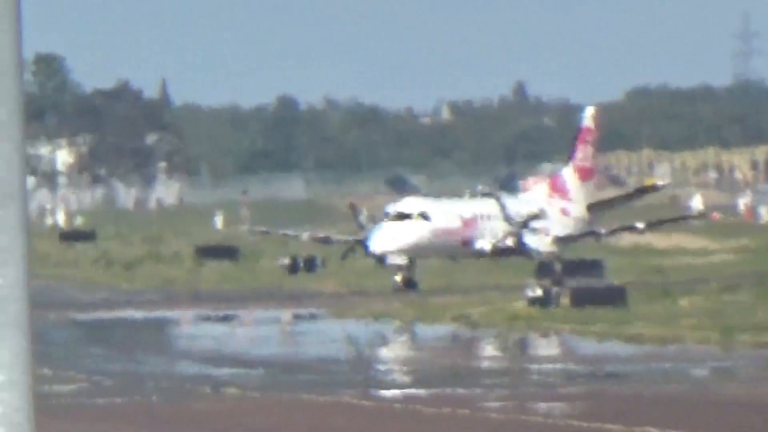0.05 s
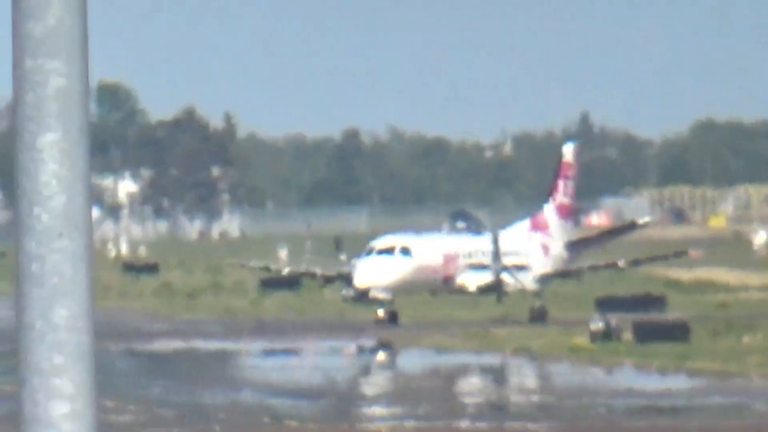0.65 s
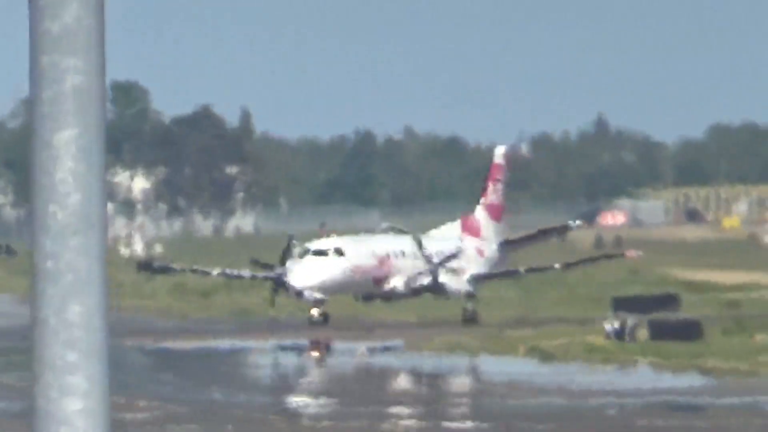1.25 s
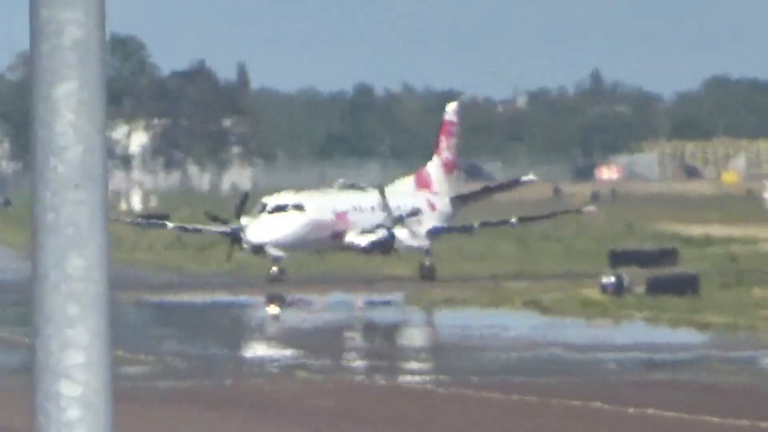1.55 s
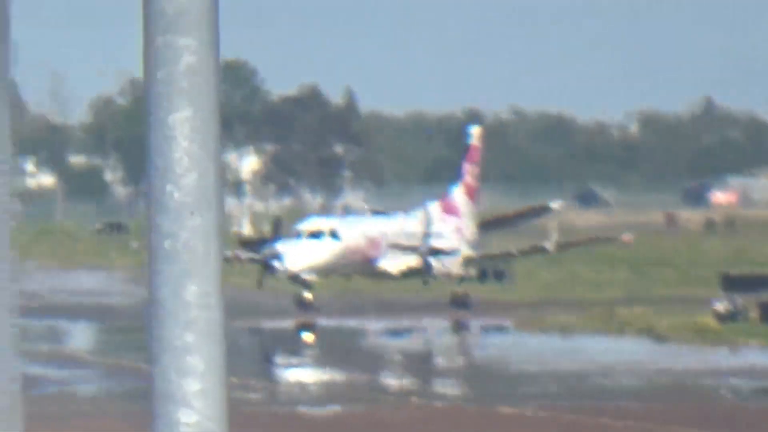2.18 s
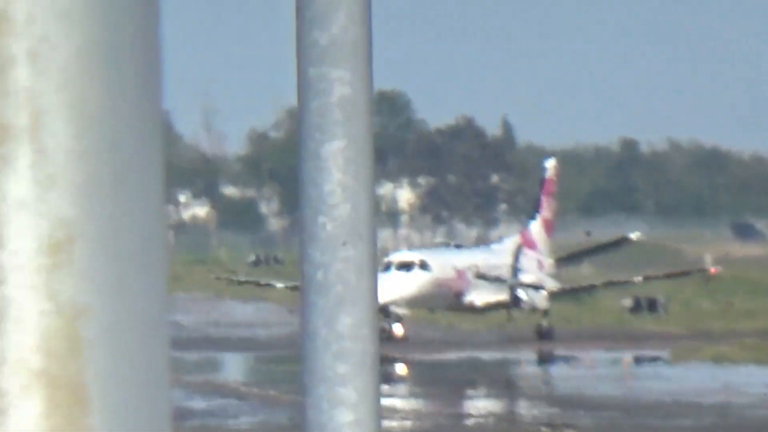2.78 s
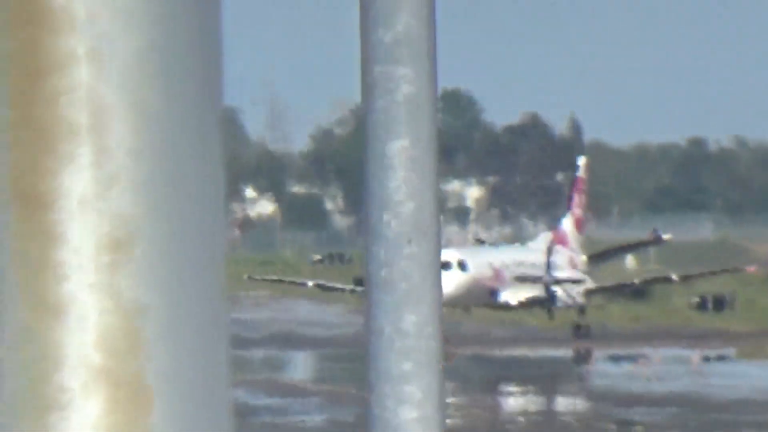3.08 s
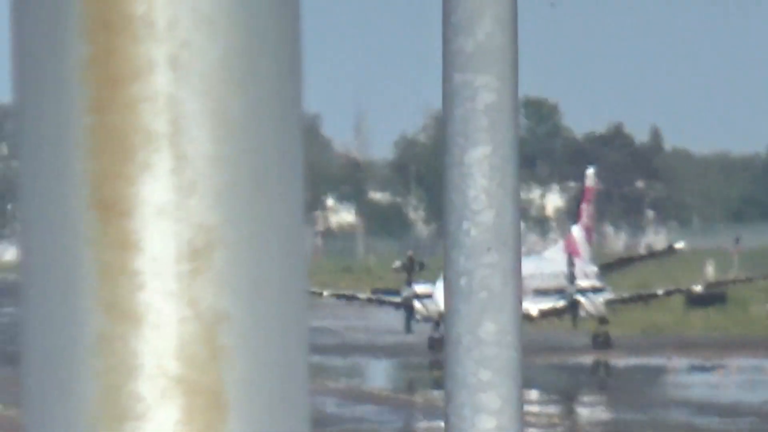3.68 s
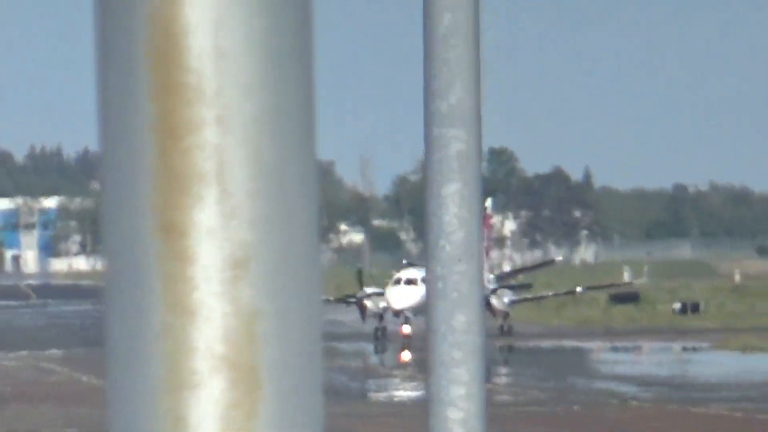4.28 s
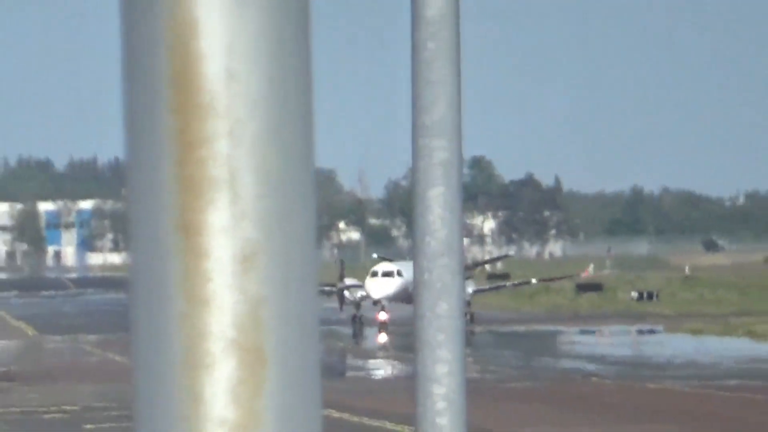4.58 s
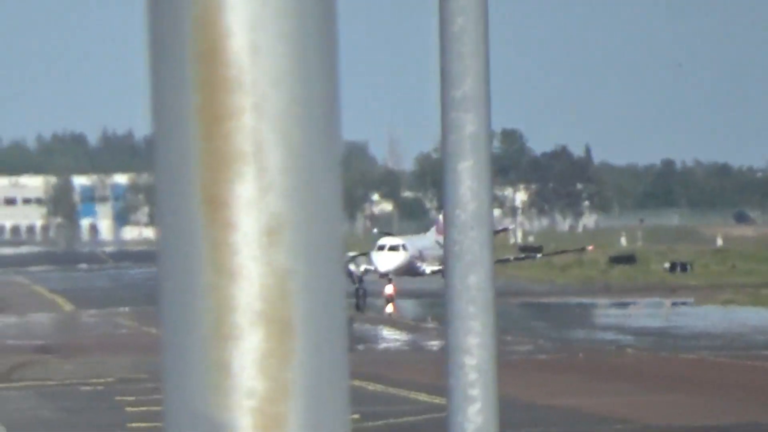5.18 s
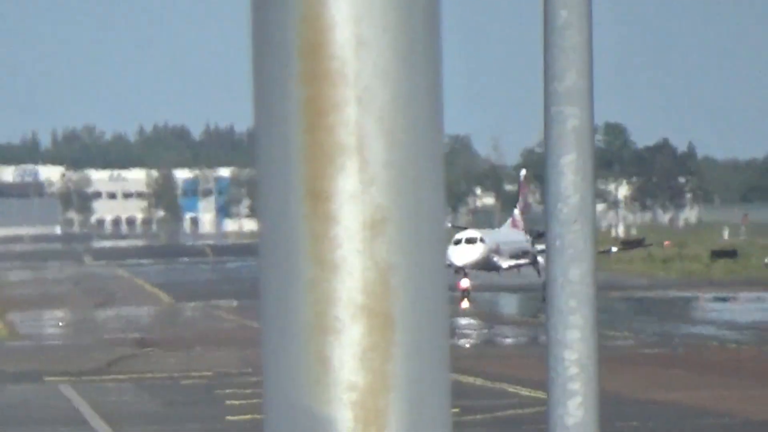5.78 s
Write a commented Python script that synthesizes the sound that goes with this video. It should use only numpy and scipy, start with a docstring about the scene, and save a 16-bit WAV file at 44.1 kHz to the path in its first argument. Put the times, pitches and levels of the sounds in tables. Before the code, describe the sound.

Steady turbine roar and hiss from a taxiing propeller plane, with a low pulsing hum that climbs, then drops away, and one sharp click.

```python
"""A low, throbbing propeller hum over steady turbine roar and hiss: a twin turboprop taxiing some way off.
The hum climbs as the blades take load, then sags away after three seconds; a far drone comes and goes.
Light wind rumbles on the microphone. The hand-held camera whines thinly, and its handling gives
one sharp tick, small ones and a faint rustle."""
import sys
import numpy as np
from scipy import signal
from scipy.fft import rfft, irfft
from scipy.io import wavfile
from scipy.ndimage import uniform_filter1d

SR = 44100
rng = np.random.default_rng(int(sys.argv[2]) if len(sys.argv) > 2 else 0)


def file_out(sig):
    """Save sig as 16-bit WAV at sys.argv[1]."""
    # one column per channel
    cols = np.atleast_2d(sig).T
    # limit, then scale
    lim = np.clip(cols, -1, 1)
    pcm = np.round(lim * 32767).astype(np.int16)
    wavfile.write(sys.argv[1], SR, pcm)


N = 261954
TIME_S = np.arange(N) / SR
BINS_HZ = np.fft.rfftfreq(N, 1 / SR)


def gain(db):
    """Decibels to amplitude factor."""
    return 10 ** (np.asarray(db) / 20)


def unit_rms(x):
    """Scale to an rms of one."""
    return x / np.sqrt(np.mean(x ** 2) + 1e-20)


def over_time(rows):
    """Columns of a time table, per sample."""
    times_s, *columns = np.transpose(rows)
    return [np.interp(TIME_S, times_s, c) for c in columns]


def over_frequency(rows):
    """Columns of a frequency table, per FFT bin, interpolated in log frequency."""
    hz, *columns = np.transpose(rows)
    return np.array([np.interp(np.log(BINS_HZ + 1), np.log(hz + 1), c) for c in columns])


def drift(rate_hz):
    """Random wander below rate_hz, unit rms."""
    return unit_rms(irfft(rfft(rng.standard_normal(N)) / (1 + (BINS_HZ / rate_hz) ** 4), N))


def coloured_noise(spectrum):
    """Unit-rms noise shaped by (frequency [Hz], relative level [dB]) rows."""
    return unit_rms(irfft(rfft(rng.standard_normal(N)) * gain(over_frequency(spectrum)[0]), N))


def swell(centre_s, half_width_s):
    """Gaussian rise and fall, peak of one."""
    return np.exp(-((TIME_S - centre_s) / half_width_s) ** 2)


def add(mix, start_s, sound):
    """Mix a stereo sound in at start_s."""
    part = mix[:, round(start_s * SR):][:, :sound.shape[1]]
    part += sound[:, :part.shape[1]]


# Phase between microphone ports, opposed in the midrange: (frequency [Hz], left lead [rad])
PORT_PHASE_RAD = [(360, 0), (385, 3.1), (1500, 3.0), (1610, .8), (1780, -.1), (1830, -3.05), (2070, -3.05),
                  (2120, -.25), (2600, 0), (3100, .3), (3450, 0), (3680, -.7), (3900, -.15), (4700, -.4),
                  (5150, -1), (5800, 0)]
# Likeness of the ports: (frequency [Hz], coherence [0-1])
PORT_COHERENCE = [(40, 0.99), (300, 0.99), (375, 0.7), (440, 0.93), (1450, 0.93), (1800, 0.93),
                  (2400, 0.92), (4200, 0.83), (4900, 0.35), (5500, 0.79), (7000, 0.94)]


def port_noise(spectrum, patchy_db):
    """One noise band at both microphone ports; moving air swells and fades patches of it."""
    shared, own = rfft(rng.standard_normal((2, N))) * np.sqrt(SR / 2)
    coherence = over_frequency(PORT_COHERENCE)[0]
    right = coherence * shared + np.sqrt(1 - coherence ** 2) * own
    right *= np.exp(-1j * over_frequency(PORT_PHASE_RAD)[0])
    in_band_hz = np.clip(BINS_HZ + 1, spectrum[0][0], spectrum[-1][0])
    skirt_db = -200 * abs(np.log2((BINS_HZ + 1) / in_band_hz))
    pair = irfft(np.array([shared, right]) * gain(over_frequency(spectrum) + skirt_db), N)
    frames = signal.stft(pair, nperseg=1024)[2]
    patches = uniform_filter1d(rng.standard_normal(frames.shape[1:]), size=12, axis=0)
    patches = unit_rms(uniform_filter1d(patches, size=9, axis=1))
    return signal.istft(frames * gain(patchy_db * patches), nperseg=1024)[1][:, :N]


# Wind rumble spectrum: (frequency [Hz], left gain [dB], right gain [dB])
RUMBLE_DB = [(20, -72, -72), (36, -68, -61.5), (55, -56, -50.5), (90, -53, -53.5), (135, -57.5, -54.5),
             (197, -57, -52), (290, -60, -55), (367.4, -54.5, -70.5)]


def wind(level_db=-0.44, ease_db_per_s=0.25, lull_db=0.84, lull_hz=1.5, dip_db=-1, puff_db=-22):
    """Wind on the ports: a rumble that slowly eases and dips briefly; one puff, mainly on the right."""
    strength_db = level_db - ease_db_per_s * TIME_S + lull_db * drift(lull_hz)
    strength_db += dip_db * swell(centre_s=4.0, half_width_s=0.36)
    rumble = port_noise(RUMBLE_DB, patchy_db=0) * gain(strength_db)
    puff = coloured_noise([(50, -28), (110, 2), (190, 6.5), (260, -35), (600, -60), (2000, -90)])
    puff *= gain(puff_db) * swell(centre_s=4.605, half_width_s=0.021)
    return rumble + puff * np.array([[0.35], [1.4]])


# Swells of the whine: (time [s], gain [dB])
WHINE_SWELLS_DB = [(2.32, -65), (2.62, -59.5), (4.69, -61), (5.7, -58)]


def camera_whine(pitch_hz=8663, waver_hz=6, flicker_db=3, steady_db=-67, half_width_s=0.047):
    """Thin, wavering tone from the camera itself, alike at both ports."""
    cycles = np.cumsum(pitch_hz + waver_hz * drift(20)) / SR
    envelope = gain(steady_db) + sum(gain(db) * swell(s, half_width_s) for s, db in WHINE_SWELLS_DB)
    return np.sqrt(2) * envelope * gain(flicker_db * drift(33)) * np.sin(2 * np.pi * cycles)


# Camera body modes: (frequency [Hz], relative level [dB], T60 [s])
BODY_MODES = [(3400, -18, .005), (5340, -3, 0.0075), (5830, -4, 0.0076), (7240, 0.5, 0.0061),
              (7730, -4, 0.0061), (9000, -8, 0.0079), (10500, -14, 0.0074)]


def tick(hits=3, bounce_s=0.0038, bounce_db=-13, rise_s=0.00027, crack_db=-20, crack_t60_s=0.013):
    """A dry click and its weaker bounces ring the camera body over a noisy crack."""
    t = np.arange(SR // 40) / SR
    crack = rng.standard_normal((2, len(t))) * gain(crack_db - 60 * t / crack_t60_s)
    sound = (1 - np.exp(-t / rise_s)) * crack
    for hit in range(hits):
        age_s = np.maximum(t - hit * bounce_s, 0)
        attack = gain(hit * bounce_db) * (1 - np.exp(-age_s / rise_s))
        for hz, mode_db, t60_s in BODY_MODES:
            phase_rad = 0.54 * rng.standard_normal((2, 1))  # near field: differs per port
            ring = gain(mode_db - 60 * age_s / t60_s) * np.sin(2 * np.pi * hz * age_s + phase_rad)
            sound += attack * ring
    return sound


# Clearer clicks of the camera body: (time [s], gain [dB])
TICKS_DB = [(3.5317, -9.5), (4.4333, -42), (4.6758, -40), (5.0554, -36), (5.1711, -39), (5.5523, -33),
            (5.6151, -34)]


def handling(rustle_db=-54.5, grain_db=4.5, faint_per_s=1.2, faint_db=-44):
    """A hand on the camera: a short grainy rustle, clear ticks, and faint ones at random."""
    rustle = coloured_noise([(2000, -26), (4800, -12), (5800, -2), (9000, 0), (11000, -2), (11800, -34)])
    rustle *= swell(centre_s=5.56, half_width_s=0.056) * gain(rustle_db + grain_db * drift(150))
    ticks = np.zeros((2, N))
    for start_s, db in TICKS_DB:
        add(ticks, start_s, gain(db) * tick())
    for start_s in rng.uniform(0, N / SR, round(faint_per_s * N / SR)):
        add(ticks, start_s, gain(faint_db) * tick())
    return ticks + rustle


# Far drone spectrum: (frequency [Hz], relative level [dB])
DRONE_SPECTRUM_DB = [(40, -38), (70, -13), (82, -2), (92, -8), (103, 2), (115, -8), (140, -5), (190, -15.5),
                     (400, -58), (1500, -100)]
# Swells of the drone: (time [s], half width [s], gain [dB])
DRONE_SWELLS_DB = [(3.17, 0.19, -33.5), (4.6, 0.3, -32), (5.18, .12, -36.5), (5.82, 0.24, -31)]


def far_drone(pan_db=2):
    """Far propeller noise, blurred into a low band by the air, coming and going."""
    envelope = sum(gain(db) * swell(s, half_width_s) for s, half_width_s, db in DRONE_SWELLS_DB)
    return coloured_noise(DRONE_SPECTRUM_DB) * envelope * gain([[-pan_db], [pan_db]])


# Exhaust roar spectrum: (frequency [Hz], left gain [dB], right gain [dB])
EXHAUST_DB = [(385.4, -56, -86), (433, -50, -59.5), (545, -45, -56), (708, -45.5, -56.5), (872, -54, -73),
              (1042, -52, -57), (1150, -58, -69), (1433, -48.5, -59), (1638, -52, -70.5), (1806, -68, -59),
              (1924, -62, -57.5), (2077, -76, -66.5)]
# Intake hiss spectrum: (frequency [Hz], left gain [dB], right gain [dB])
INTAKE_DB = [(2110, -72.5, -67), (2180, -71.5, -66), (2570, -70, -74), (2670, -76, -77.5), (3045, -66, -75),
             (3610, -74.5, -69.5), (3670, -82, -73.5), (4274, -81.5, -79.5), (4940, -98, -94.5),
             (5290, -87, -86.5), (6170, -94.5, -93.5), (6680, -85.5, -87.5), (7030, -83.5, -84),
             (9020, -100.2, -100.1), (10780, -103.9, -103.9)]


def turbines(roar_db=-0.28, rise_db_per_s=0.1164, swell_db=0.21, swell_hz=1.8):
    """Exhaust roar and intake hiss, swelling slightly in the air; the roar grows as the aircraft nears."""
    roar = port_noise(EXHAUST_DB, patchy_db=0.5)
    roar *= gain(roar_db + rise_db_per_s * TIME_S + swell_db * drift(swell_hz))
    hiss = port_noise(INTAKE_DB, patchy_db=0.58) * gain(swell_db * drift(swell_hz))
    return roar + hiss


# Propeller speed: (time [s], speed [rev/s])
SPEED_RPS = [(0, 25.65), (0.15, 26.01), (0.62, 25.43), (1.17, 25.56), (1.3, 25.29), (1.6, 25.52),
             (1.9, 26.25), (2.2, 26.82), (2.62, 28.33), (2.9, 28.72), (3.0, 28.3), (3.3, 21.2)]
# Propeller effort: (time [s], hum gain [dB], blade load [0-1])
BLADE_EFFORT = [(0, -28, 0.15), (0.13, -24.5, 0.09), (0.65, -27.5, 0.33), (1.17, -24.5, 0.66),
                (1.3, -26.5, 0.6), (1.6, -22, 1), (1.9, -22.5, 1), (2.2, -23.5, 0.89), (2.65, -25, 0.86),
                (2.93, -25, 1), (3.03, -33, 0.8), (3.12, -30, 0.22), (3.3, -45, 0.05)]
# Weak harmonics, relative to the strong ones together: (multiple, idle level [dB], loaded level [dB])
OVERTONES_DB = [(2, -24, -31), (7, -20.5, -15.5), (8, -15.5, -20), (9, -31, -19), (10, -23, -19.5),
                (11, -20.5, -14), (12, -24.5, -23.5), (13, -26, -22), (14, -28, -22.5)]


def propeller(pan_db=3, waver_turns=0.0018, wander_db=1.6, smear_rad=0.48, flutter=0.3, fade_s=0.058):
    """Harmonics in step throb once a turn; their strongest band climbs and widens with blade load."""
    speed_rps, = over_time(SPEED_RPS)
    hum_db, load = over_time(BLADE_EFFORT)
    turns = -0.199 + np.cumsum(speed_rps) / SR + waver_turns * drift(7.9)
    centre_hz = np.interp(load, [0, 1], [99.7, 150.4])
    width_hz = np.interp(load, [0, 1], [14.5, 32])
    multiples = np.arange(3, 7)[:, None]
    off_centre = abs(multiples * speed_rps - centre_hz) / width_hz
    weights = gain([wander_db * drift(2.8) for _ in multiples]) / np.hypot(1, off_centre ** 2.8)
    weights /= np.linalg.norm(weights, axis=0)
    lag_rad = smear_rad * (multiples - 5) ** 2  # staggered arrival softens each throb
    hum = np.sum(weights * np.cos(2 * np.pi * multiples * turns - lag_rad), axis=0)
    for multiple, idle_db, loaded_db in OVERTONES_DB:
        # scattered arrival: level and phase wander
        weight = gain(idle_db + load * (loaded_db - idle_db)) * (1 + flutter * drift(4.5))
        hum += weight * np.cos(2 * np.pi * (multiple * turns + rng.random()) + drift(0.85) / 2)
    stop_s = SPEED_RPS[-1][0]
    fade = np.clip((stop_s - TIME_S) / fade_s, 0, 1)
    return np.sqrt(2) * hum * fade * gain(hum_db) * gain([[-pan_db], [pan_db]])


def scene():
    """Aircraft, wind and small camera sounds, in stereo."""
    return propeller() + far_drone() + turbines() + camera_whine() + wind() + handling()


def record(dry):
    """Steep low-pass band limit."""
    cutoff_hz = 11600
    lowpass = signal.firwin(511, cutoff_hz, window=("kaiser", 9), fs=SR)
    return signal.oaconvolve(dry, lowpass[None], "same")


dry = scene()
out = record(dry)
file_out(out)
```